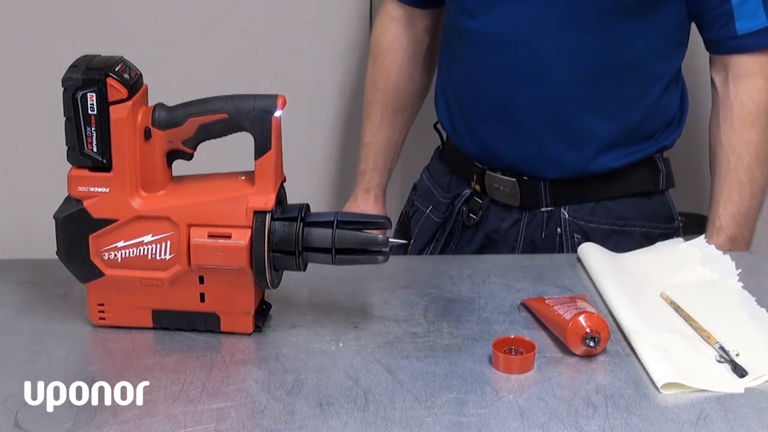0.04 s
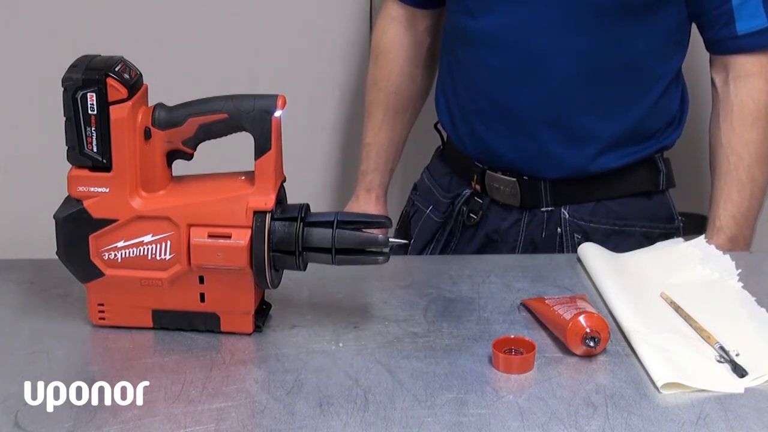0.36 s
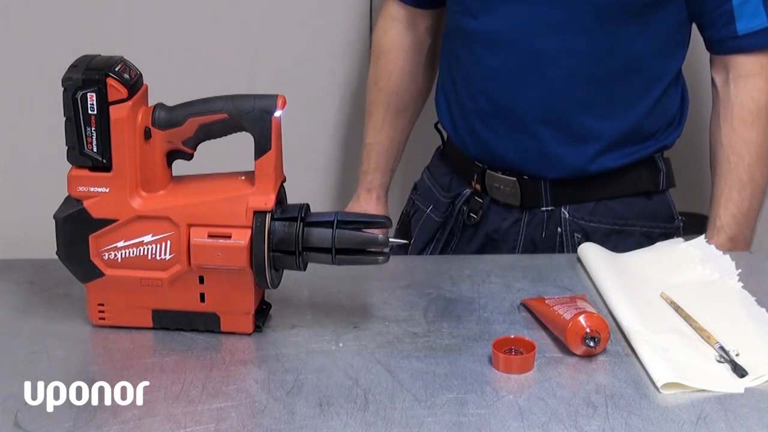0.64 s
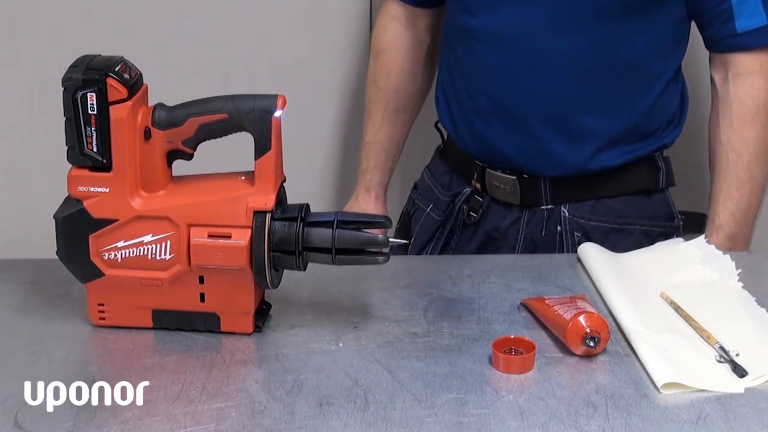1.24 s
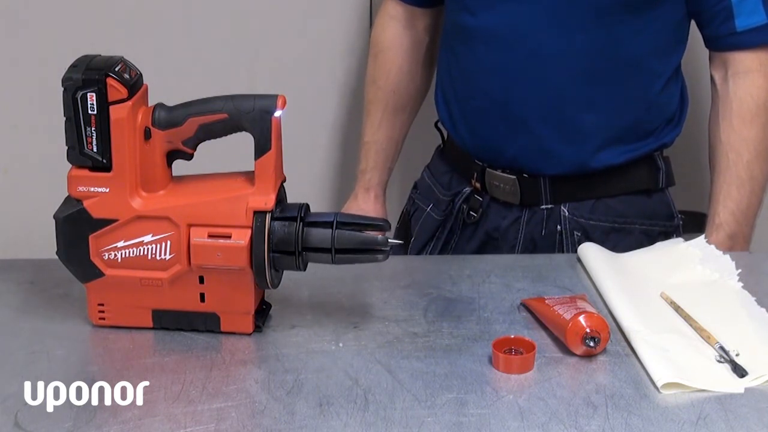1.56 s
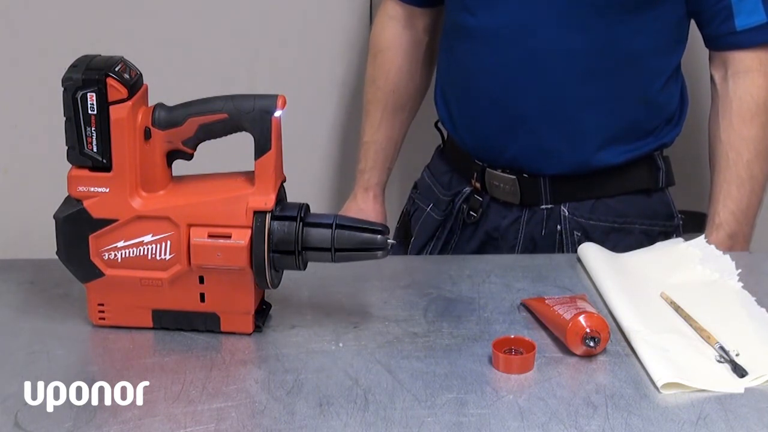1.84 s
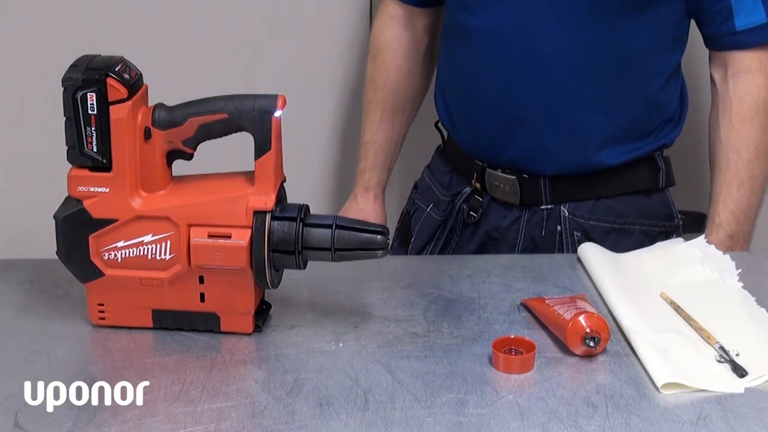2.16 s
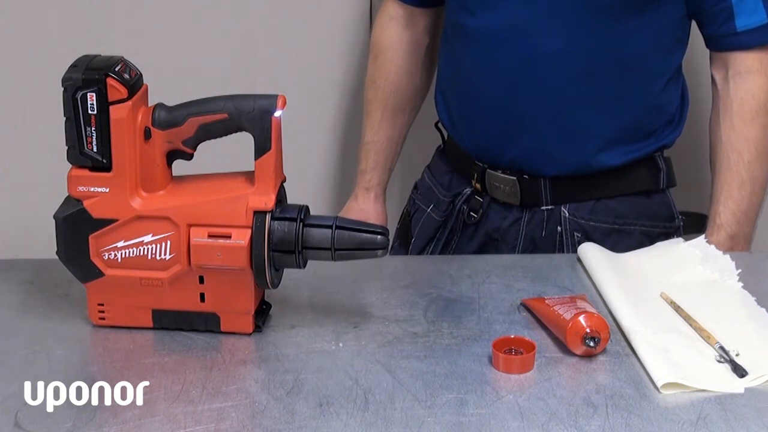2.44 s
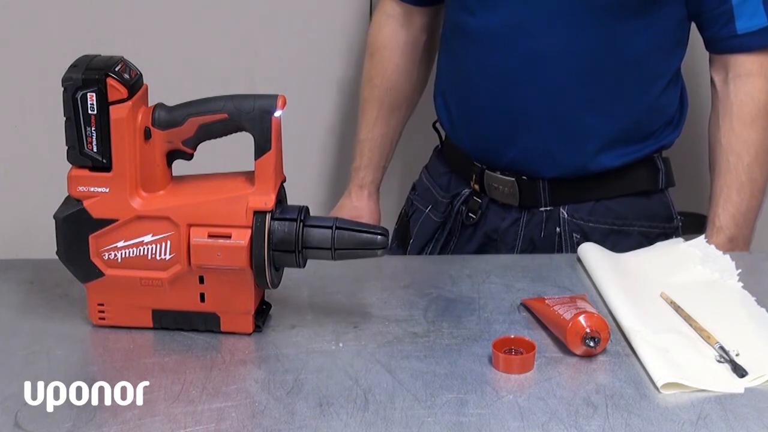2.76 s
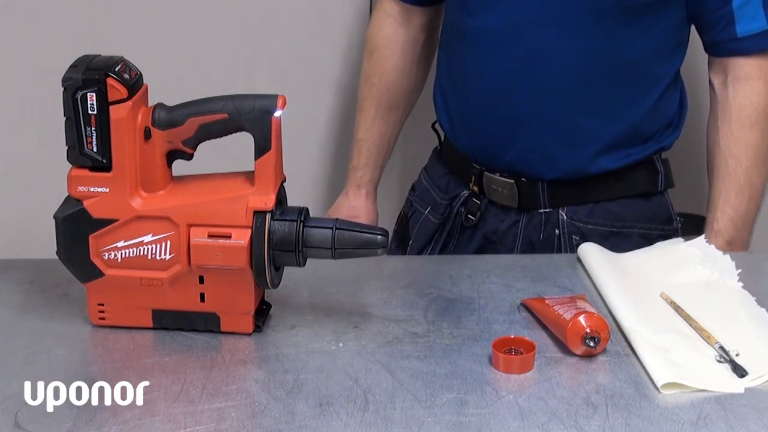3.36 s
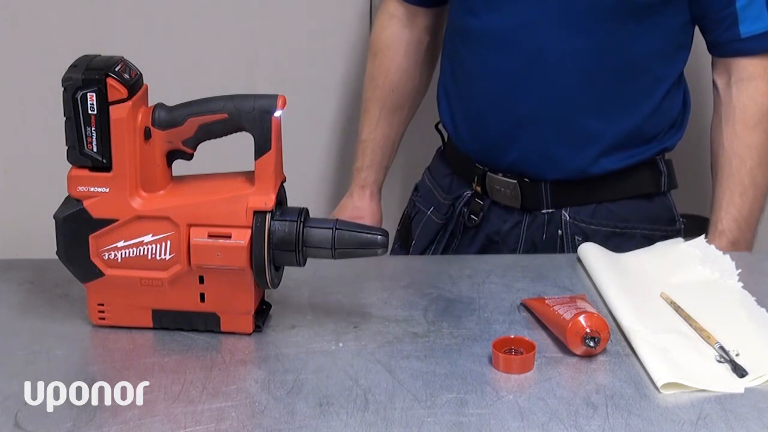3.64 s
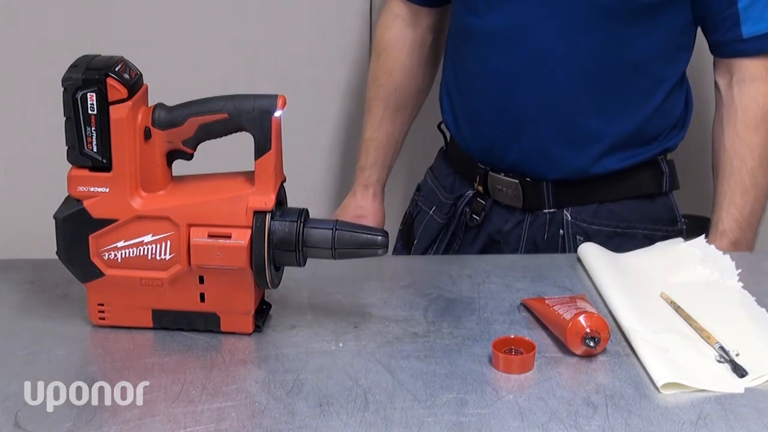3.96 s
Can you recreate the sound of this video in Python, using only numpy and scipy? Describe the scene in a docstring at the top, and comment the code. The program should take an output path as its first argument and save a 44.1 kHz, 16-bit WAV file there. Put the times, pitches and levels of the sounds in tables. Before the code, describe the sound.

Cordless pipe expanding tool whirring, labouring and cutting out with a thump, followed by a click.

```python
"""Over quiet ventilation, a cordless pipe expander whines and whirrs freely on a workbench.
With a dull knock the load comes on: the motor sags, growls and grinds while the hydraulic pump
builds pressure, its valves spitting. The relief valve opens with a thump, the motor brakes and the
pressure escapes in a short gush. The returning head clicks home, a fairly live workshop rings
after it, and near the end the tool ticks faintly as it is handled."""
import sys
import numpy as np
from scipy import signal
from scipy.fft import rfft, irfft, next_fast_len
from scipy.io import wavfile
from scipy.ndimage import map_coordinates

SR = 44100
rng = np.random.default_rng(int(sys.argv[2]) if len(sys.argv) > 2 else 0)


def wav_record(signal):
    """Record a signal, one row per channel, as 16-bit PCM in the file named by sys.argv[1]."""
    frames = np.transpose(np.atleast_2d(signal))
    bounded = np.clip(frames, -1, 1)
    # unit amplitude maps onto the largest positive 16-bit level
    quanta = np.round(bounded * 32767).astype(np.int16)
    wavfile.write(sys.argv[1], SR, quanta)


N = 176400


def amp(db):
    return 10 ** (np.asarray(db) / 20)


def unit(x):
    return x / np.sqrt(np.mean(x ** 2) + 1e-20)


def along(points, hz):
    """Read a curve of (Hz, value) points on a log frequency axis."""
    f, v = np.transpose(points)
    return np.interp(np.log(hz + 1), np.log(f + 1), v)


def wobble(rate):
    """A smooth random curve with `rate` knots a second."""
    return map_coordinates(rng.standard_normal(int(N * rate / SR) + 4), [np.arange(N) * rate / SR])


def filtered(x, response):
    """Shape x with a gain that depends on frequency."""
    size = next_fast_len(N + SR // 2)
    return irfft(rfft(x, size) * response(np.fft.rfftfreq(size, 1 / SR)), size)[..., :N]


def spread(pair, side_db):
    """Left and right from a middle and a weaker side signal."""
    side = amp(side_db) * pair[1]
    return np.array([pair[0] + side, pair[0] - side])


def noise(response):
    """Nearly mono noise of rms 1 with the given response."""
    return unit(spread(filtered(rng.standard_normal((2, N)), response), side_db=-14))


def coloured(points):
    """Noise with a spectrum of (Hz, dB) points."""
    return noise(lambda hz: amp(along(points, hz)))


def band(centre_hz):
    """Noise about an octave wide."""
    return noise(lambda hz: np.exp(-(np.log((hz + 1) / centre_hz) / 0.374) ** 2))


def decay(t, start, t60):
    """Silence, then a sudden start that dies away."""
    return (t >= start) * amp(-60 * np.maximum(t - start, 0) / t60)


def low_cut(x):
    """The small tool radiates little bass."""
    return signal.sosfilt(signal.butter(3, 165, "high", fs=SR, output="sos"), x)


def ventilation():
    """A quiet bed of moving air: centred in the bass, wide above it."""
    # Each row: frequency in Hz, relative noise level in dB.
    colour = [(15, -31), (28, -4), (48, -4.5), (70, -11), (95, -5.5), (150, -6.5), (240, -2), (350, -6),
              (540, -14), (760, -12), (1300, -18), (2600, -20.5), (5000, -27.5), (9500, -32), (12500, -32),
              (15500, -34.5)]
    # Each row: frequency in Hz, side level against the middle in dB.
    width = [(100, -25), (250, -20), (500, -8), (1000, -4), (3000, -3), (10000, -0.5)]
    mid = filtered(rng.standard_normal(N), lambda hz: amp(along(colour, hz)))
    side = filtered(rng.standard_normal(N), lambda hz: amp(along(colour, hz) + along(width, hz)))
    return amp(-58.5) * np.array([mid + side, mid - side]) / mid.std()


def whine(turns, load):
    """Motor harmonics and a thin gear-mesh tone: clean when running free, rough under load."""
    # Four load steps, from 0 (running free) to 1 (full load).
    load_steps = [0, .16, .36, 1]
    # Each row: multiple of the motor speed, then its level in dB at each of the four load steps.
    harmonics = [(1, -37, -41.5, -38, -43), (2, -27.5, -35.5, -35.5, -38), (3, -26, -24, -34, -52.5),
                 (4, -40.5, -25.5, -30, -47.5), (5, -29, -43, -39.5, -50.5), (6, -45.5, -35.5, -42, -49.5),
                 (7, -38.5, -35, -34, -43), (8, -22, -30.5, -39, -52), (9, -37.5, -31, -39.5, -44.5),
                 (10, -43, -51, -54.5, -36.5), (11, -48.5, -50, -58, -51), (12, -42.5, -52.5, -55.5, -48),
                 (13, -41.5, -52.5, -46.5, -51)]
    partials = [(multiple, np.interp(load, load_steps, levels)) for multiple, *levels in harmonics]
    gear_mesh = (15.42, -47.5 - 8 * load)
    out = np.zeros((2, N))
    for multiple, level_db in partials + [gear_mesh]:
        shimmer_db = 0.82 * (1 + 4 * load) * wobble(45)
        jitter = 0.15 * multiple / 8 * np.sqrt(load) * (.6 * wobble(70) + wobble(200))
        phase = 2 * np.pi * (multiple * turns + jitter + rng.random())
        out += amp(level_db + shimmer_db) * np.sqrt(2) * np.array([np.sin(phase), np.cos(phase)])
    return spread(out, side_db=-17.5)


def whirr(turns):
    """Gears and fan make a rush that pulses once a turn."""
    # Each row: frequency in Hz, relative noise level in dB.
    colour = [(60, -42), (200, -30), (300, -9.5), (420, -1), (650, -3), (950, -2), (1500, 0.5), (1850, -2),
              (2850, 2), (3900, -4), (4850, -3), (5700, -8), (7300, -11), (8600, -20), (11500, -15.5),
              (15500, -28.5)]
    pulse = unit(1 + 0.45 * np.cos(2 * np.pi * turns))
    return amp(-29.5) * pulse * coloured(colour)


def bench_knock(t):
    """A dull knock through the bench as the load comes on."""
    return amp(-55) * decay(t, start=.425, t60=.18) * band(110)


def growl(turns, load):
    """Under load the strongest gear tone smears into a rough band that sags with the speed."""
    multiple, width_hz, fully_in_load = 8, 150, .38
    smear = filtered(rng.standard_normal((2, N)), lambda hz: 1 / (1 + (2 * hz / width_hz) ** 4))
    phase = 2 * np.pi * multiple * turns
    rough = unit(smear[0] * np.cos(phase) + smear[1] * np.sin(phase))
    return amp(-28 - 5 * load) * np.minimum(load / fully_in_load, 1) * rough


def grind(strokes, load):
    """The labouring drive grinds and rings its housing, swelling on each pump stroke."""
    # Each row: frequency in Hz, relative noise level in dB.
    colour = [(150, -35), (400, -14), (900, -1.5), (1400, 1.5), (2100, 0), (2700, -2.5), (4000, 2.5),
              (4900, -5.5), (5800, -8), (9000, -18), (15000, -30.5)]
    # Each row: housing resonance in Hz, its width in Hz, relative level in dB.
    modes = [(748.4, 26, -1.5), (1511, 68, -4.5), (2735, 120, -2.5), (2964, 130, 0), (3546, 110, -5),
             (4820, 120, -5.5)]
    housing = noise(lambda hz: sum(amp(db) * 1j * hz * width / (centre ** 2 - hz ** 2 + 1j * hz * width)
                                   for centre, width, db in modes))
    swing_db, lead_strokes = 2.5, 0.26
    swell = amp(swing_db * np.cos(2 * np.pi * (strokes + lead_strokes)))
    return swell * load ** 0.4 * (amp(-27.5) * coloured(colour) + amp(-26) * housing)


def pump(t, strokes, load):
    """The valves spit twice a stroke, harder with pressure, until the relief valve opens."""
    # Each row: start as a share of the stroke, relative level in dB, decay time in strokes.
    spits = [(0.005, 2.5, 0.098), (.13, 0, .28)]
    # Each row: frequency in Hz, relative noise level in dB.
    colour = [(1500, -29.5), (3200, -6.5), (4600, 1.5), (5800, -6), (7400, -5), (8600, -14.5), (10500, -8),
              (13000, -10.5), (15500, -31)]
    relief_s = 1.394
    stroke_number = (np.floor(strokes) - np.floor(strokes[0])).astype(int)
    power = np.zeros(N)
    for share, db, life in spits:
        spit_db = db + .8 * rng.standard_normal(400)[stroke_number % 400]
        age = (strokes - share) % 1
        power += (amp(spit_db) * np.exp(-age / life)) ** 2
    pressure = load ** 0.82 * amp(-500 * np.maximum(t - relief_s, 0))
    return amp(-20.5) * np.sqrt(power) * pressure * coloured(colour)


def relief_thumps(t):
    """The relief valve and the released piston shake the tool's body against the bench."""
    # Each row: start in seconds, relative level in dB, time to fall 60 dB in seconds.
    hits = [(1.3935, -6.5, 0.022), (1.415, -16.5, 0.047), (1.452, -28.5, 0.11), (1.477, -29.5, .07)]
    # Each row: body resonance in Hz, relative level in dB.
    modes = [(165, -10), (215, -15.5), (260, 0.5), (335, 3.5), (410, 3), (490, -1.5)]
    out = np.zeros(N)
    for start, db, t60 in hits:
        body = sum(amp(mode_db) * np.sin(2 * np.pi * hz * rng.normal(1, 0.035) * (t - start))
                   for hz, mode_db in modes)
        attack = 1 - decay(t, start, t60=0.013)
        out -= amp(db) / 2 * body * attack * decay(t, start, t60)
    return np.array([out, out])


def gush(t):
    """A last short rasp as the pressure escapes."""
    peak_s, half_length_s = 1.425, .016
    return amp(-28) * np.exp(-((t - peak_s) / half_length_s) ** 2) * band(3400)


def head_clicks(t):
    """The head snaps home in a double click and a faint third, each with a brief ring."""
    # Each row: start in seconds, level in dB, time to fall 60 dB in seconds.
    hits = [(1.7677, -30.5, 0.0154), (1.7704, -32.5, 0.041), (1.926, -55, 0.039)]
    # Each row: frequency in Hz, relative noise level in dB.
    colour = [(300, -30), (800, -13.5), (1330, 7.5), (2100, -1.5), (3200, 4.5), (5500, -1), (7500, -16),
              (10000, -24), (14000, -25.5)]
    snaps = coloured(colour) * sum(amp(db) * decay(t, start, t60) for start, db, t60 in hits)
    ring = noise(lambda hz: 1 / (1 + ((hz - 1300) / 170) ** 4))
    ring_envelope = sum(amp(db - 7) * decay(t, start, t60=0.071) for start, db, _ in hits) / 2
    return snaps + ring * ring_envelope


def handling_ticks(t):
    """The tool ticks faintly as it is handled."""
    # Each row: start in seconds, level in dB, centre in Hz, time to fall 60 dB in seconds.
    ticks = [(3.415, -53, 1150, .09), (3.434, -64, 10500, .06)]
    return sum(amp(db) * decay(t, start, t60) * band(hz) for start, db, hz, t60 in ticks)


def workshop(send):
    """Quick reflections from bench and wall, then a tail that lingers longest in the mids."""
    # Each row: frequency in Hz, reverb time in seconds.
    reverb_times = [(120, 0.71), (350, .85), (1300, 1.25), (3000, 1.14), (5000, .8), (8000, 0.7),
                    (11000, .33), (15000, 0.46)]
    hz, frame_s, spectrum = signal.stft(rng.standard_normal((2, SR)), SR, nperseg=256)
    fade = amp(-60 * frame_s / along(reverb_times, hz)[:, None])
    tail = signal.istft(spectrum * fade, SR, nperseg=256)[1]
    age = np.arange(tail.shape[1]) / SR
    tail = tail * (age > .008) / np.linalg.norm(tail[0])
    early = rng.standard_normal(tail.shape) * decay(age, start=0.0027, t60=0.068)
    early = amp(0.5) * early / np.linalg.norm(early[0])
    response = spread(early + tail, side_db=-11)
    return signal.fftconvolve(send.mean(axis=0)[None], response, axes=1)[:, :N]


def scene():
    """One motor speed sets pitch, load and pump rate; the release and the clicks follow."""
    # The motor sags under load. Each row: time in seconds, speed in turns a second.
    speed_curve = [(0, 404.8), (.42, 405.3), (.5, 403), (.6, 395.4), (.7, 385.3), (.8, 378.2), (.95, 369.4),
                   (1.15, 357.4), (1.3, 352.4), (1.39, 348)]
    free_hz, loaded_hz = 405.4, 350
    stop_s, brake_db_per_s, brake_hz_per_s = 1.3995, 319, 500
    turns_per_stroke, stroke_start_s = 10.62, 1.1795
    t = np.arange(N) / SR
    speed = np.interp(t, *np.transpose(speed_curve))
    load = np.clip((free_hz - speed) / (free_hz - loaded_hz), 0, 1)
    braking_s = np.maximum(t - stop_s, 0)
    flutter_hz = (.2 + 2.5 * load) * wobble(70)
    turns = np.cumsum(np.maximum(speed - brake_hz_per_s * braking_s, 0) + flutter_hz) / SR
    strokes = (turns - np.interp(stroke_start_s, t, turns)) / turns_per_stroke
    running = amp(-brake_db_per_s * braking_s)

    tone = running * (whine(turns, load) + growl(turns, load))
    drive = whirr(turns) + grind(strokes, load) + pump(t, strokes, load)
    rasp = low_cut(running * drive) + gush(t)
    thumps = low_cut(relief_thumps(t))
    clicks = head_clicks(t) + handling_ticks(t)
    send = amp(-19) * tone + amp(-10.5) * rasp + amp(-4) * thumps + amp(-5.5) * clicks
    return tone + rasp + thumps + clicks + bench_knock(t) + workshop(send) + ventilation()


def record(dry):
    """The stereo image narrows to near mono in the top treble, and the very top is cut away."""
    # Each row: frequency in Hz, gain of the side signal in dB.
    width = [(30, -3), (120, 1.5), (300, 0), (1200, 0.5), (3000, 0.5), (6500, -4), (10500, -6),
             (12500, -21)]
    # Each row: frequency in Hz, left minus right in dB.
    balance = [(100, -0.5), (300, 0.4), (700, 0.6), (1300, -0.6), (3000, -1.4), (6000, 0)]
    top_hz = 15750
    side = filtered((dry[0] - dry[1]) / 2, lambda hz: amp(along(width, hz)))
    pair = dry.mean(axis=0) + np.array([side, -side])
    return filtered(pair, lambda hz: amp(np.outer([.5, -.5], along(balance, hz))) * (hz < top_hz))


dry = scene()
out = record(dry)
wav_record(out)
```